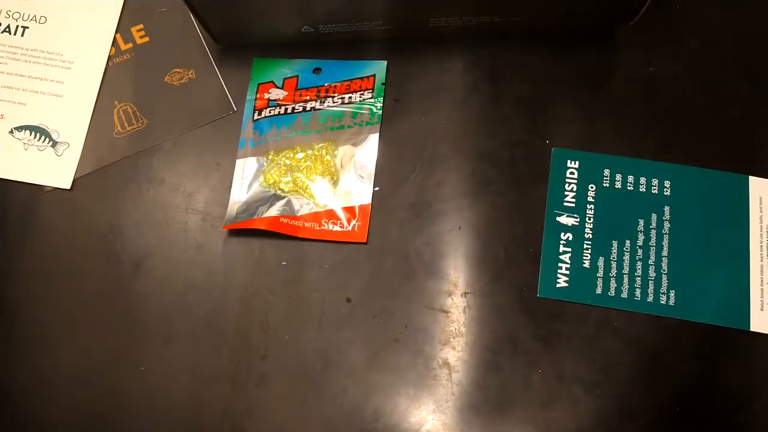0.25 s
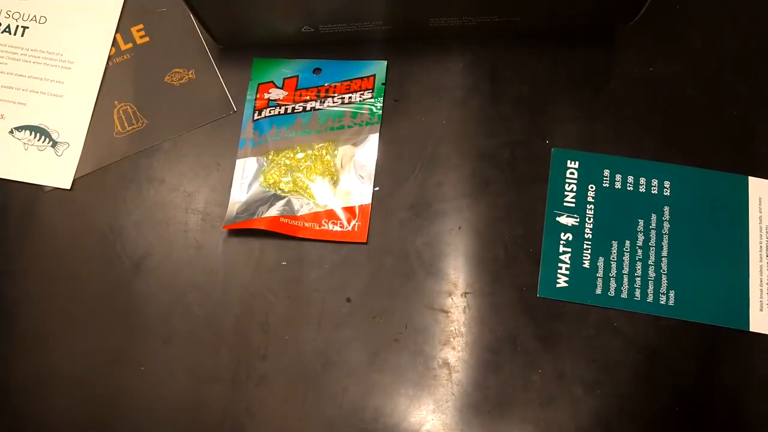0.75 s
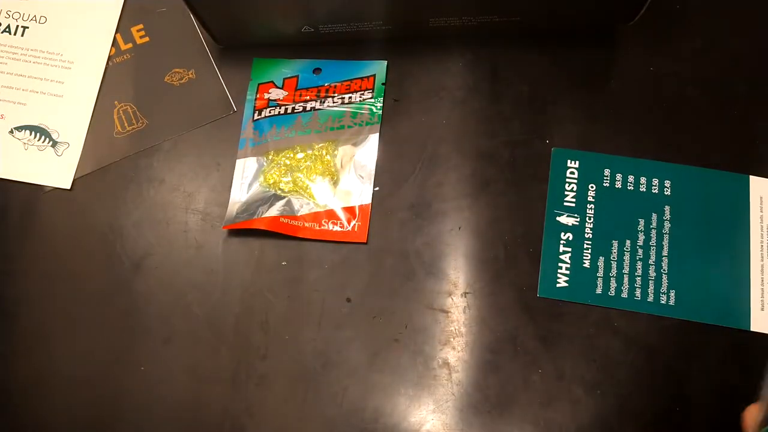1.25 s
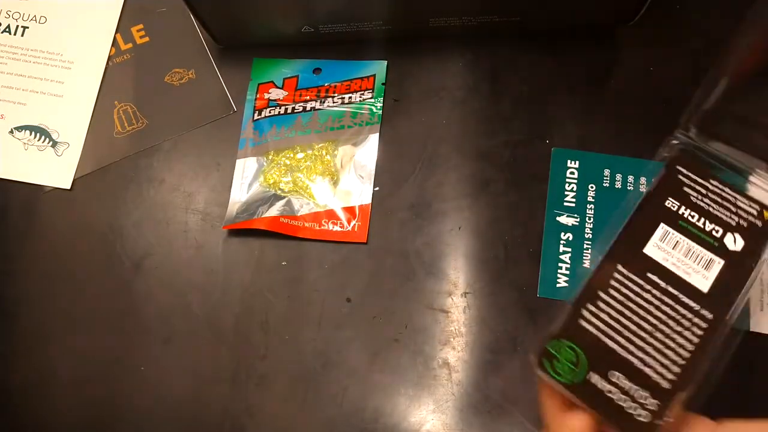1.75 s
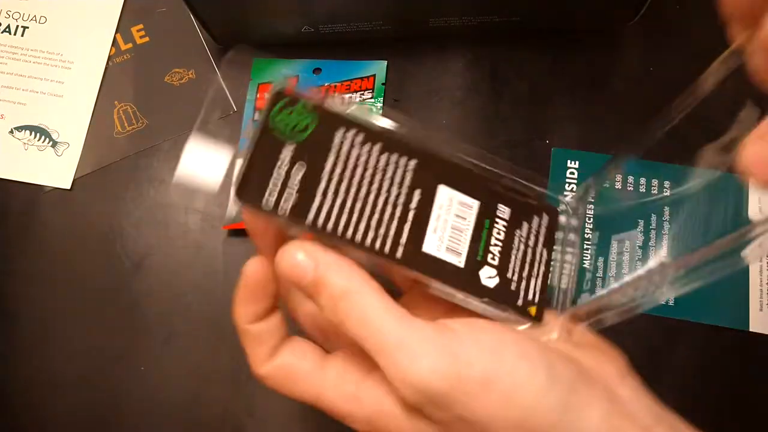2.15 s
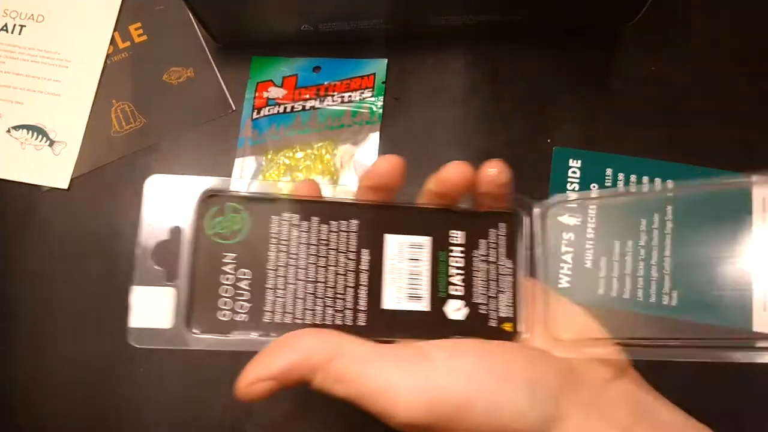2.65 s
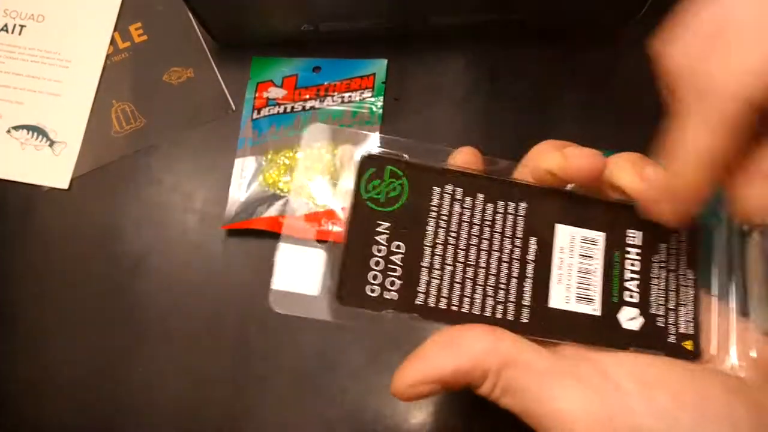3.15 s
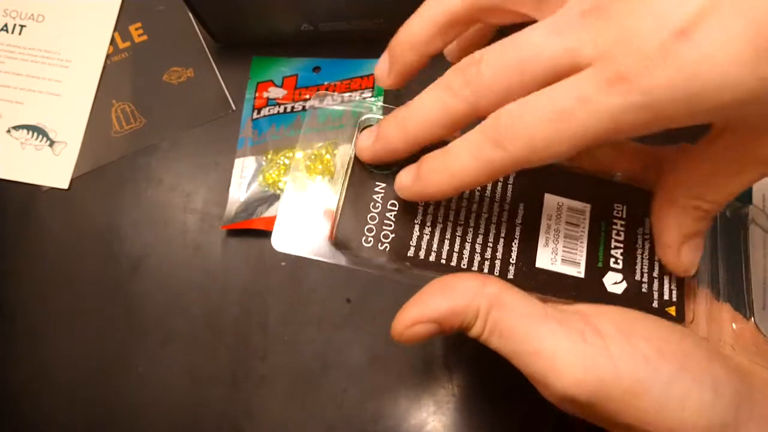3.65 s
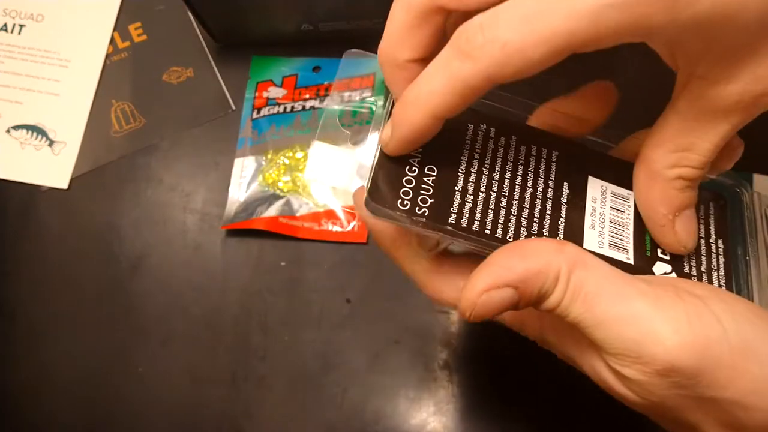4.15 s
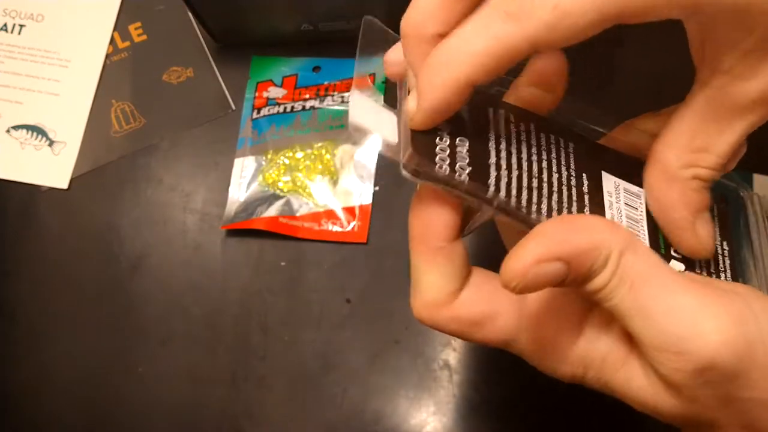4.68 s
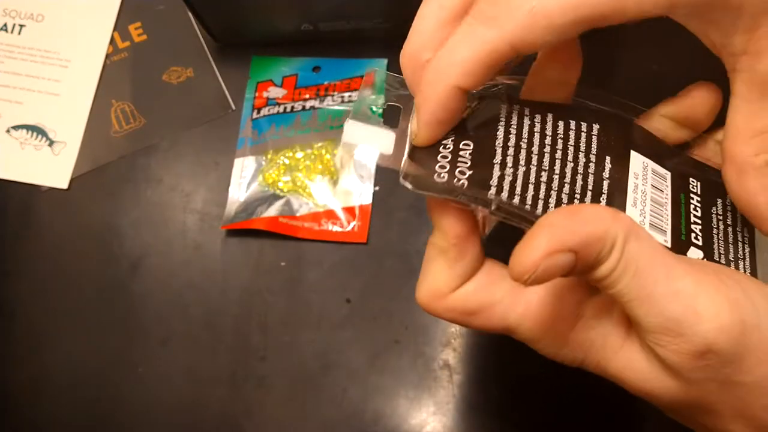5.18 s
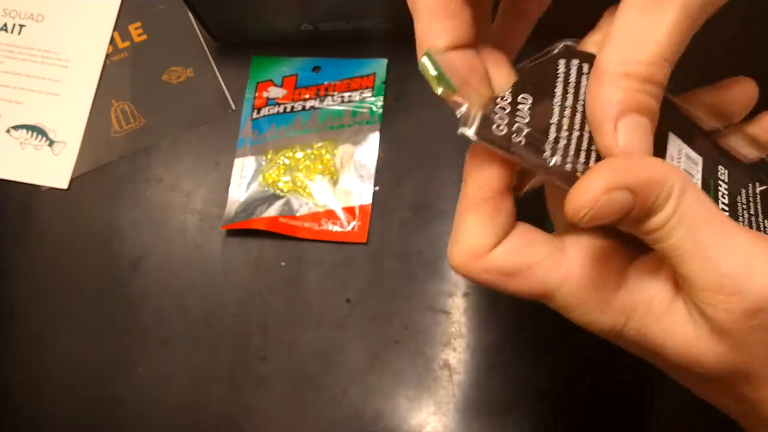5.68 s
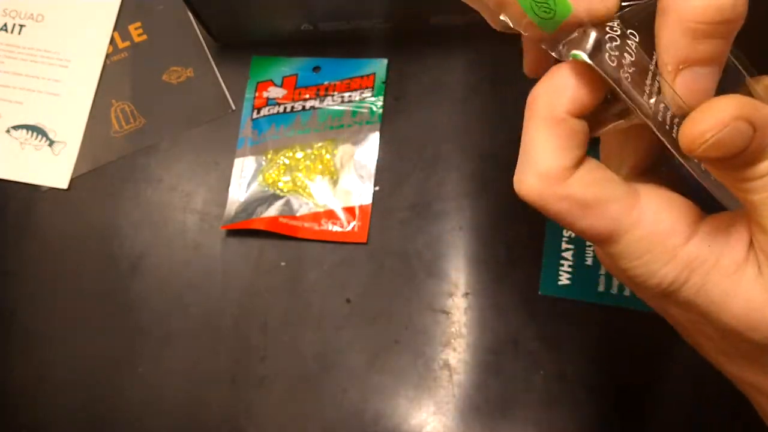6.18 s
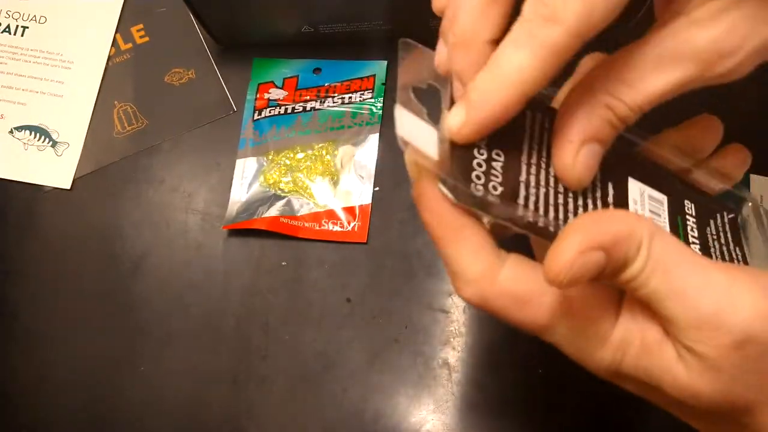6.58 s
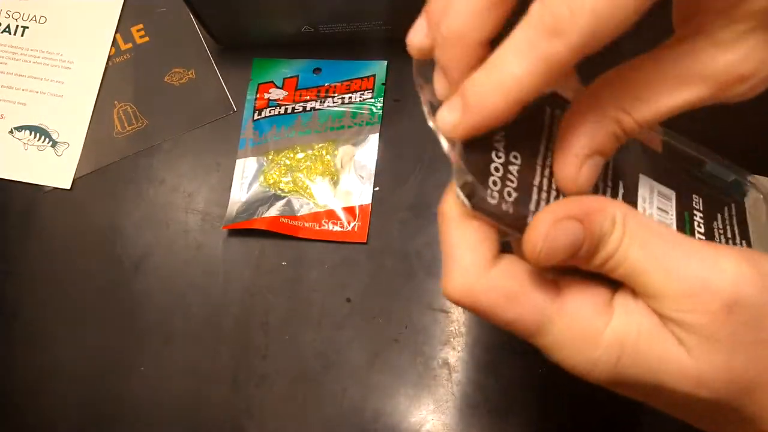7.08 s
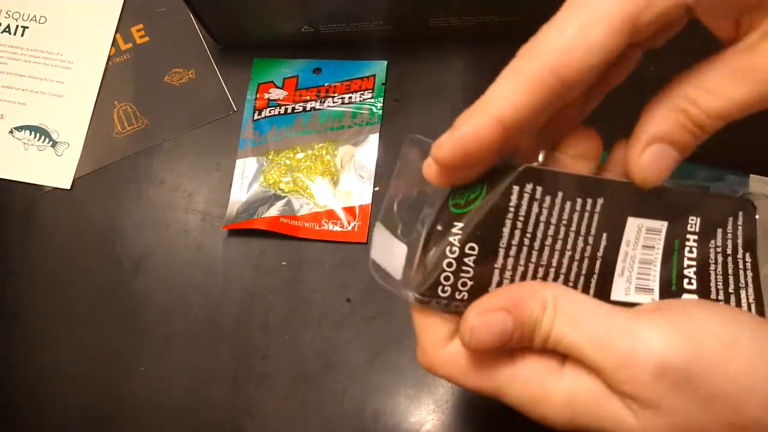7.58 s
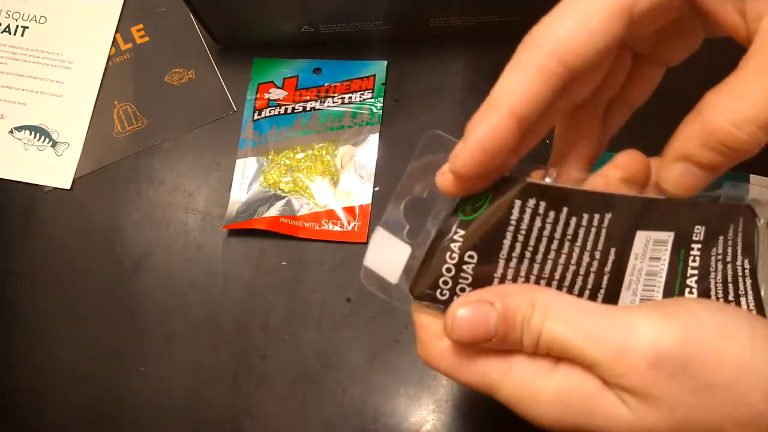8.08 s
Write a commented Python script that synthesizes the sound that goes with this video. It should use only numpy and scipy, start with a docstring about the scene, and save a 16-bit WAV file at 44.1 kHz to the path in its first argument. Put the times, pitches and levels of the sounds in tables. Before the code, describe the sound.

Close up in a small quiet room, a rigid plastic clamshell is forced open: a brush and hollow tocks, quick rim snaps, then a loud double pop at one second. Afterwards the thin shell is turned and flexed, giving much quieter dry crackles, short slides and small creaks, with two stronger buckles after five seconds. Faint hiss and hum lie underneath; the microphone's top end is dull.

```python
"""A brush of plastic and hollow tocks, then a run of rim snaps and a double pop: a clear clamshell pack is
pried open by hand over a table in a small room. Then the open shell is turned and flexed, so that it buckles
in dry crackles while fingers and the card inside slide over it.
Snaps, pops and buckles are shaped noise plus ringing modes; slides, rustle and creaks are trains of tiny slips;
dents and bumps are short sines. Echoes, a room tail, hiss and hum surround them."""
import sys
import numpy as np
from scipy import signal
from scipy.fft import rfft, irfft
from scipy.io import wavfile
from scipy.ndimage import uniform_filter1d

SR = 44100
rng = np.random.default_rng(int(sys.argv[2]) if len(sys.argv) > 2 else 0)


def wav_record(signal):
    """Record a signal, one row per channel, as 16-bit PCM in the file named by sys.argv[1]."""
    frames = np.transpose(np.atleast_2d(signal))
    bounded = np.clip(frames, -1, 1)
    # unit amplitude maps onto the largest positive 16-bit level
    quanta = np.round(bounded * 32767).astype(np.int16)
    wavfile.write(sys.argv[1], SR, quanta)


N = 367353

# Event levels are those before the layer gains in scene(); bass and treble are relative to the source's colour.
# stiff rim slipping out of its groove: (time [s], level [dB], bass [dB])
RIM_SNAPS = [(0.113, -40, -12), (.147, -32.5, -5.5), (.179, -44.5, -2), (.231, -19, -2.5), (.256, -28.5, 3),
             (.375, -28.5, -12), (0.549, -45, 2.5), (.62, -35.5, -8.5), (0.65, -35.5, -6.5),
             (.684, -35.5, 2.5), (.715, -34.5, -1), (.739, -29.5, -2.5), (.756, -35, -7.5),
             (.772, -29.5, 1.5), (.79, -31, 5), (0.814, -31, -7), (0.877, -29.5, -5.5), (.907, -31, 1.5),
             (.922, -38, 3.5), (.958, -36, 2), (.969, -31, 1.5)]
# two halves springing apart: (time [s], level [dB], bass [dB], treble [dB])
POPS = [(1.001, -12, 8, 2.3), (1.009, -15, -5, -0.5), (1.039, -15, 4.5, -0.5), (1.05, -24.5, -5, 7.5)]
# thin wall buckling in the hand: (time [s], level [dB], bass [dB], treble [dB])
BUCKLES = [(1.682, -51.5, 9, 11.5), (2.18, -40.5, 11, 7), (2.192, -38.5, 4, 2), (2.304, -43, -10, 4.5),
           (2.325, -44.5, -20, 6), (2.435, -48.5, -8, 9.5), (2.486, -41, -8.5, 3), (2.538, -40.5, -1, 0.5),
           (2.561, -42, -5, 6), (2.616, -45.5, 1, -8), (2.696, -51.5, -17, 3.5), (2.846, -53, 15.5, 9.5),
           (2.919, -59, -5, 10), (2.971, -39, 9.5, 16.5), (3.051, -44.5, 15.5, 7.5), (3.091, -48, 2.5, 7.5),
           (3.233, -42, 6.5, -4.5), (3.584, -51, 7, 7), (3.669, -45, -8, 0), (3.745, -55, 18, 20),
           (3.869, -55.5, 8, 1), (4.166, -53.5, -1.5, -2.5), (4.468, -50, 4.5, -7), (4.497, -55.5, 14.5, 1),
           (4.521, -50.5, -2, -3.5), (4.547, -50, 4.5, -1.5), (4.818, -52, -3.5, -2.5),
           (4.865, -49, -3, -4), (4.992, -41.5, -7, -16), (5.074, -28, -1.5, -4.5),
           (5.141, -42.5, 6.5, -11), (5.165, -41, -9, 1.5), (5.178, -43.5, -11, -6), (5.193, -46.5, -16, 0),
           (5.205, -40, -9, -5), (5.24, -40.5, 0, -2.5), (5.411, -27, -5, -16.5), (5.439, -43.5, 13, 18),
           (5.562, -41, -1.5, 4), (5.733, -45, -12, 2.5), (5.769, -47, -10, 4), (5.796, -47, -14, 6),
           (5.895, -53.5, -9, 4), (5.998, -52.5, -7.5, 10), (6.224, -43.5, 17, 9.5), (6.235, -40, -11, 5.5),
           (6.285, -50.5, 11.5, 4), (6.344, -49.5, -8, 18), (6.527, -55, -15, -3), (6.792, -55.5, 9, 2),
           (6.926, -55, -4.5, -4.5), (7.118, -54, 0, 8), (7.239, -47.5, 4, 0), (7.272, -44.5, 5, 3.5),
           (7.298, -45, 17, 3.5), (7.31, -45, 1, 4), (7.449, -39, -18, -2), (7.608, -48, 6, -2),
           (7.631, -51, 0.5, -4), (8.14, -60.5, -8, -5), (8.216, -53, 15.5, 0)]
# plastic dragging on plastic, card or skin: (time [s], length [s], level [dB], bass [dB], treble [dB])
SLIDES = [(.005, 0.041, -48, 22, 2), (0.07, 0.016, -46.5, 10, 15), (0.275, 0.079, -41, -1, 18),
          (0.463, 0.18, -51, 8.5, 11.5), (0.635, 0.15, -45, 7, 10), (0.73, 0.056, -36.5, 6, 23),
          (0.906, 0.18, -34.5, 10, 13), (1.055, 0.1, -40, 2, -1), (1.147, 0.071, -47.5, -1, 21),
          (1.313, 0.049, -46, 10, 11.5), (2.068, 0.053, -51.5, -12, 5.5), (2.166, 0.082, -44, -1, 9),
          (2.497, 0.1, -45, -2, 3.5), (3.061, 0.28, -60, 22, 12.5), (3.487, 0.023, -57, 11, 4.5),
          (3.885, 0.042, -51.5, 7, -3), (4.775, 0.062, -51.5, 5, -10.5), (5.102, .11, -45.5, -1, -12),
          (5.356, 0.1, -51.5, 3.5, 2.5), (5.777, 0.037, -48, -6, 4.5), (6.13, .11, -48, 0, 11),
          (6.389, 0.026, -52.5, 1.5, 7.5), (6.574, 0.047, -55.5, 3, 0), (7.156, 0.074, -47.5, 7, 1),
          (7.441, 0.074, -51.5, 2, 4), (8.225, 0.02, -52, 0.5, 14)]
# soft bumps of the hands: (time [s], level [dB], pitch [Hz])
BUMPS = [(1.035, -44, 128), (2.191, -57, 242), (2.85, -59, 161), (3.666, -62, 117), (3.715, -65, 106),
         (3.793, -67, 135), (3.862, -63, 107), (7.295, -60, 300)]
# how hard the fingers work the pack, as rustle: (time [s], level [dB])
GRIP = [(1.201, -52.5), (1.36, -57.5), (1.8, -70), (2.15, -58), (2.801, -59.5), (3.15, -57), (3.4, -67),
        (4.08, -58.5), (4.36, -68.5), (4.681, -69), (4.95, -59.5), (5.55, -65.5), (5.9, -56),
        (6.449, -65.5), (7.15, -69), (7.36, -52), (7.781, -68), (8.33, -71.5)]
# shallow dents flipping over: (time [s], level [dB], middle of the pitch glide [Hz])
DENTS = [(.039, -36, 755), (.052, -43, 970), (.075, -40, 860), (2.028, -45, 1580), (2.324, -35.5, 1616),
         (3.609, -48, 1619), (5.194, -32, 1115), (5.263, -38, 1047), (7.263, -42.5, 1703),
         (7.402, -32.5, 1725), (7.758, -48, 1146)]
# bent wall creaking under a finger: (time [s], length [s], level [dB], middle of the pitch glide [Hz])
CREAKS = [(2.076, .06, -45.5, 1790), (2.314, 0.025, -43, 1680), (2.561, 0.066, -45.5, 1630),
          (2.77, 0.063, -57.5, 1250), (4.016, 0.079, -54, 1340), (4.276, 0.037, -59, 1400),
          (5.169, 0.051, -40, 1253), (5.651, 0.082, -57, 1270), (6.569, .06, -57.5, 1500),
          (6.748, 0.039, -50.5, 1460), (7.391, 0.055, -44, 1620)]
# spectra of rim, pop, hand-held wall and still air: (frequency [Hz], relative density [dB per Hz])
RIM_COLOUR = [(59, -52), (100, -24), (348, -30), (511, -4), (886, -18), (989, -10), (1330, -17),
              (1510, -5.5), (1680, -11), (2470, -10.5), (3440, -12.5), (6660, -2.5), (7430, 1), (8000, -14),
              (10400, -40.5), (17600, -120)]
POP_COLOUR = [(47, -55), (90, -31.5), (220, -15), (380, -20.5), (600, -7), (870, -9), (1080, 0),
              (1450, -7.5), (1950, -9.5), (2400, -13.5), (3300, -16), (4400, -12.5), (7300, -11),
              (8000, -24.5), (10400, -55.5), (17600, -120)]
WALL_COLOUR = [(59, -43.5), (100, -18.5), (183, -23.5), (484, -18.5), (661, -21.5), (854, -17), (1060, -1),
               (1380, -8), (1620, -2.5), (2060, -6), (2260, -4.5), (3440, -12), (6910, -10), (7570, -12),
               (8000, -24.5), (10400, -42), (17600, -120)]
AIR_COLOUR = [(18, -50.5), (30, -7.5), (111, 1), (169, -1), (421, -4), (656, -9.5), (720, -2.5),
              (791, -8.5), (1260, -2.5), (1390, -7), (3070, -12), (7120, -13), (8000, -25), (10400, -51.5),
              (17600, -120)]
# ringing of the whole pack, and of the wall damped by fingers: (frequency [Hz], relative level [dB], t60 [s])
PACK_MODES = [(624, -7.5, .16), (689, -5, .12), (838, -9.5, .12), (943, 1.5, 0.095), (1090, 5, 0.086),
              (1120, -2.5, 0.059), (1283, -5.5, .14), (1350, -9, 0.16), (1876, -4, 0.18), (2030, -6.5, .12),
              (2620, -7.5, 0.095), (2760, -1, 0.099)]
WALL_MODES = [(1065, -2, 0.03), (1260, 2, 0.073), (1493.5, -9, 0.02), (1583.4, -2, 0.14), (1805, 2, 0.045),
              (1890, -9.5, .06), (2250, -1.5, 0.045), (2510, -8, 0.03)]
# decay of the room: (frequency [Hz], t60 [s])
ROOM_T60_S = [(120, 0.39), (500, 0.42), (1200, 0.28), (3000, 0.22), (7500, 0.29)]
# echoes off the close surfaces: (delay [s], level [dB])
ECHOES = [(.0021, -20.5), (.0047, -18.5), (.0073, -18.5)]
# faint hum in the room: (frequency [Hz], level [dB])
HUM = [(118.4, -80), (721.4, -86.5), (1249, -86.5)]

AIR_DB = -72
MIC_EDGE_HZ = 8150
# a small snap is brighter than a large one: treble at a middling level, and its fall per dB of level
RIM_TREBLE_DB, RIM_MIDDLING_DB, RIM_DULLING = 1.5, -31.5, .22
# small buckles: rate, offset from the GRIP level, scale of the colour spread
CRINKLES_PER_S, CRINKLE_OFFSET_DB, CRINKLE_COLOUR_DB = 9, 3, 9.5
# pitch sag as a fraction, bandwidth of each of two equal poles, slip rate
CREAK_SAG, CREAK_POLE_WIDTH_HZ, CREAK_SLIPS_PER_S = .05, 720, 260
# the rings carry little below this
RING_LOW_HZ = 450


def amp(db):
    """Decibels to gain."""
    return 10 ** (np.asarray(db) / 20)


def unit(x):
    """Scales to rms 1."""
    return x / np.sqrt(np.mean(x ** 2) + 1e-20)


def read(points, hz):
    """Reads a table on a log-frequency axis."""
    f, value = np.transpose(points)
    return np.interp(np.log(hz + 1), np.log(f + 1), value)


def add(mix, time_s, sound):
    """Mixes a sound in at time_s."""
    part = mix[max(round(time_s * SR), 0):][:len(sound)]
    part += sound[:len(part)]


def coloured(x, colour, bass_db=0, treble_db=0, size=2048):
    """Minimum-phase filter with the given spectrum and a lift or dip on either side of the middle."""
    hz = np.fft.rfftfreq(size, 1 / SR)
    # a bass lift fades out by 100 Hz, a dip goes on down
    bass = read([(100, min(bass_db, 0)), (280, bass_db), (700, bass_db), (950, 0)], hz)
    treble = read([(2400, 0), (4000, treble_db)], hz)
    cepstrum = irfft(np.log(amp(read(colour, hz) + bass + treble)))
    # folding the cepstrum makes the filter causal
    cepstrum[1:size // 2] *= 2
    cepstrum[size // 2 + 1:] = 0
    response = irfft(np.exp(rfft(cepstrum)))
    return signal.oaconvolve(x, response)[:len(x)]


def highpass(x, hz):
    """Second-order high-pass: little remains below the given frequency."""
    return signal.lfilter(*signal.butter(2, hz, "highpass", fs=SR), x)


def slips(length, per_s, spread_db, t60_s):
    """Stick and slip: tiny releases of uneven size, each a brief shiver of the sheet."""
    happens = rng.random(length) < per_s / SR
    sizes = amp(spread_db * np.minimum(rng.exponential(1, length), 3.5)) * happens
    decay = np.exp(-np.log(1e6) / (t60_s * SR))
    power = signal.lfilter([1], [1, -decay], sizes ** 2)
    return np.sqrt(power) * rng.standard_normal(length)


def air():
    """Steady hiss and hum of the room: shaped noise and sines."""
    t = np.arange(N) / SR
    hum = sum(amp(db) * unit(np.sin(2 * np.pi * hz * t)) for hz, db in HUM)
    return amp(AIR_DB) * unit(coloured(rng.standard_normal(N), AIR_COLOUR)) + hum


def room(x, delay_s=0.0091, build_s=0.0065):
    """Dense wall reflections that build quickly and die at their own speed in each band."""
    hz, t, bands = signal.stft(rng.standard_normal(SR * 3 // 4), SR, nperseg=256)
    decay = amp(-60 * t / read(ROOM_T60_S, hz)[:, None])
    tail = signal.istft(bands * decay, SR, nperseg=256)[1]
    tail *= np.clip((np.arange(len(tail)) / SR - delay_s) / build_s, 0, 1)
    return signal.fftconvolve(x, tail / np.linalg.norm(tail))[:N]


def nearby(x):
    """Close surfaces repeat each sound within a few milliseconds and give it a hollow colour."""
    out = x.copy()
    for delay_s, db in ECHOES:
        add(out, delay_s, amp(db) * x)
    return out


def bumps(swell_s=.009):
    """Flesh meets the pack: a few soft, low cycles."""
    t, out = np.arange(SR // 5) / SR, np.zeros(N)
    swell = t / swell_s * np.exp(1 - t / swell_s)
    for time_s, db, hz in BUMPS:
        add(out, time_s, amp(db) * swell * np.sin(2 * np.pi * hz * t))
    return out


def grip():
    """The fingers never hold quite still, so the wall keeps rustling with small slips."""
    grains = slips(N, per_s=150, spread_db=0.5, t60_s=0.098)
    rustle = unit(coloured(grains, WALL_COLOUR, bass_db=1.5, treble_db=1.5))
    # -60 dB ahead of the first row
    return amp(np.interp(np.arange(N) / SR, *np.transpose(GRIP), left=-60)) * rustle


def slides(hollow_db=-4.5):
    """Short drags: dense slips that swell and ebb with the stroke; separate, slower slips flex the wall."""
    out = np.zeros(N)
    for time_s, length_s, db, bass_db, treble_db in SLIDES:
        end_s = length_s + .06
        t = np.arange(round(end_s * SR)) / SR
        stroke = np.interp(t, [0, .016, length_s, length_s + .015, end_s], [0, 1, 1, .4, 0])
        grains = slips(len(t), per_s=900, spread_db=3, t60_s=.025)
        # each stroke finds its own hollow spot on the wall
        band_hz = rng.uniform(1350, 1850) * np.array([.82, 1.22])
        hollow = signal.butter(2, band_hz, "bandpass", fs=SR)
        flexing = unit(signal.lfilter(*hollow, slips(len(t), per_s=300, spread_db=2.5, t60_s=.02)))
        rubbing = unit(coloured(grains, WALL_COLOUR, bass_db, treble_db))
        drag = rubbing + amp(hollow_db - max(treble_db, 0)) * flexing
        add(out, time_s - .004, amp(db) * stroke * unit(drag))
    return out


def creaks(spread_db=2.0, slip_t60_s=0.0084):
    """A quick train of slips rings one hollow spot of the wall, swelling, ebbing and sagging in pitch."""
    out, r = np.zeros(N), np.exp(-np.pi * CREAK_POLE_WIDTH_HZ / SR)
    for time_s, length_s, db, hz in CREAKS:
        along = np.linspace(0, 1, round(length_s * SR))
        drive = slips(len(along), CREAK_SLIPS_PER_S, spread_db, slip_t60_s)
        pitch_hz = hz * (1 + CREAK_SAG * (.5 - along))
        turn = np.exp(2j * np.pi * np.cumsum(pitch_hz) / SR)
        # resonate at the moving pitch: shift it to zero, smooth, shift back
        smooth = signal.lfilter([(1 - r) ** 2], [1, -2 * r, r ** 2], drive / turn)
        ring = (turn * smooth).real
        add(out, time_s, amp(db) * unit(ring * np.sqrt(along * (1 - along))))
    return out


def tock(hz, swell_s=0.0011, glide=0.089, settle_s=0.0042, ring_db=-20, ring_t60_s=0.0491):
    """A dent rings for a few uneven cycles, its pitch sagging as the tension leaves it."""
    t = np.arange(SR // 24) / SR
    thump = t / swell_s * np.exp(1 - t / swell_s)
    ring = amp(ring_db - 60 * t / ring_t60_s) * (1 - np.exp(-t / swell_s))
    pitch_hz = hz * (1 + glide * (2 * np.exp(-t / settle_s) - 1))
    phase = 2 * np.pi * np.cumsum(pitch_hz) / SR
    shiver = unit(uniform_filter1d(rng.standard_normal(len(t)), size=36))
    return (thump + ring) * (np.sin(phase) + .7 * shiver * np.cos(phase))


def dents(per_s=40, small_db=3, spread_db=5.5, low_hz=1050, high_hz=2000):
    """Large dents flip with a hollow tock, and many tiny ones follow the level of the grip."""
    out = np.zeros(N)
    for time_s, db, hz in DENTS:
        add(out, time_s - .001, amp(db) * tock(hz))
    when_s, level_db = np.transpose(GRIP)
    count = round(per_s * (when_s[-1] - when_s[0]))
    for time_s in np.sort(rng.uniform(when_s[0], when_s[-1], count)):
        db = np.interp(time_s, when_s, level_db) + small_db + spread_db * rng.uniform(-6.0, 1)
        add(out, time_s, amp(db) * tock(rng.uniform(low_hz, high_hz)))
    return highpass(out, 450)


def crinkles(bass_db=3, treble_db=4.0):
    """Rows of small buckles at uneven intervals, their level following the grip, each of its own colour."""
    when_s, level_db = np.transpose(GRIP)
    count = round(CRINKLES_PER_S * (when_s[-1] - when_s[0]))
    jitter, bass, treble = rng.uniform(-0.83, 1, (count, 3)).T
    time_s = when_s[0] + (np.arange(count) + jitter) / CRINKLES_PER_S
    db = np.interp(time_s, when_s, level_db) + CRINKLE_OFFSET_DB
    return list(zip(time_s, db, bass_db + CRINKLE_COLOUR_DB * bass, treble_db + CRINKLE_COLOUR_DB * treble))


def rim_snaps():
    """Rows of the rim's snaps, each with the brightness that goes with its size."""
    return [(time_s, db, bass_db, RIM_TREBLE_DB - RIM_DULLING * (db - RIM_MIDDLING_DB))
            for time_s, db, bass_db in RIM_SNAPS]


def snaps(rows, colour, modes, rise_s, t60_s, linger_db, linger_t60_s, dull_hz, ring_db):
    """Each snap shakes countless fast-dying modes of the sheet (as noise), and a few that ring on."""
    t, out = np.arange(SR // 6) / SR, np.zeros(N)
    head = round(.012 * SR)  # the stretch that sets the level
    hz, mode_db, mode_t60_s = np.transpose(modes)[:, :, None]
    dying = amp(mode_db - 60 * t / mode_t60_s)
    attack = 1 - np.exp(-t / rise_s)
    dull = signal.butter(1, min(dull_hz, .4 * SR), fs=SR)
    for time_s, db, bass_db, treble_db in rows:
        sharp, late = rng.standard_normal((2, len(t)))
        # the lower bending waves outlast the treble
        linger = signal.lfilter(*dull, late) * amp(linger_db - 60 * t / linger_t60_s)
        shake = sharp * amp(-60 * t / t60_s) + linger
        crack = coloured(attack * shake, colour, bass_db, treble_db)
        # the place of the snap weights the modes, and the tension of the grip detunes them
        weight, detune, phase = rng.uniform(-1, 1, (3, len(modes), 1))
        tones = np.sin(2 * np.pi * hz * (1 + 0.0092 * detune) * t + np.pi * phase)
        ring = highpass(attack * ((1 + .5 * weight) * dying * tones).sum(0), RING_LOW_HZ)
        ring_gain = amp(ring_db - max(treble_db, 0) / 2)
        sound = crack / crack[:head].std() + ring_gain * ring / ring[:head].std()
        add(out, time_s, amp(db) * sound / sound[:head].std())
    return out


def scene():
    """The rim snaps free, the halves pop apart, and the open shell is handled in a small room."""
    handling = amp(-0.5) * dents() + amp(-5) * creaks() + amp(-2) * slides() + amp(-4.0) * grip()
    wall = snaps(BUCKLES + crinkles(), WALL_COLOUR, WALL_MODES, rise_s=0.00062, t60_s=0.048,
                 linger_db=-14.5, linger_t60_s=0.1, dull_hz=3500, ring_db=-6.5)
    rim = snaps(rim_snaps(), RIM_COLOUR, WALL_MODES, rise_s=.0004, t60_s=0.058,
                linger_db=-22.0, linger_t60_s=0.28, dull_hz=9060, ring_db=-22.5)
    pop = snaps(POPS, POP_COLOUR, PACK_MODES, rise_s=0.0003, t60_s=0.078,
                linger_db=-24.5, linger_t60_s=.26, dull_hz=2800, ring_db=-5.5)
    opening = nearby(amp(-0.5) * rim + amp(-3.5) * pop)
    handled = nearby(wall + handling) + bumps()
    reverb = room(amp(-13.0) * opening + amp(-12.5) * handled)
    return (opening + handled + reverb + air())[None]


def record(dry):
    """A narrow-band microphone with a steep upper edge: a linear-phase low-pass."""
    taps = signal.firwin(141, MIC_EDGE_HZ, window=("kaiser", 8), fs=SR)
    return signal.oaconvolve(dry, taps[None], "same")


dry = scene()
out = record(dry)
wav_record(out)
```